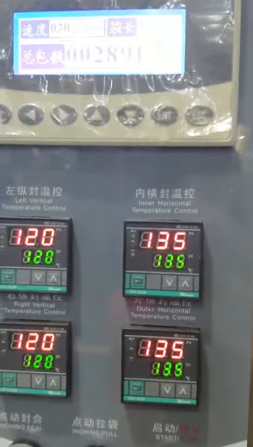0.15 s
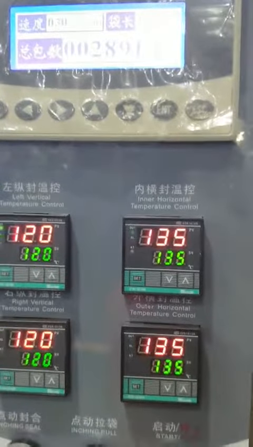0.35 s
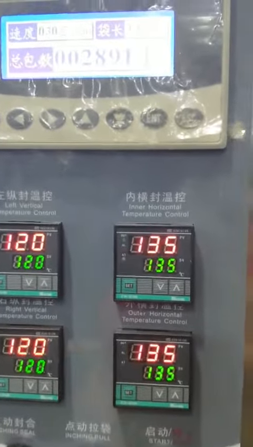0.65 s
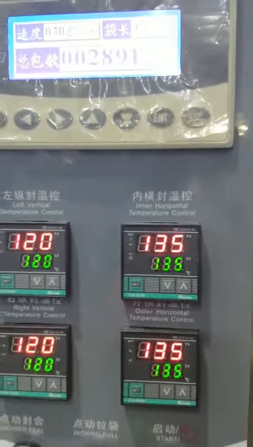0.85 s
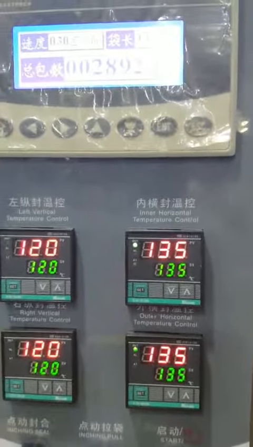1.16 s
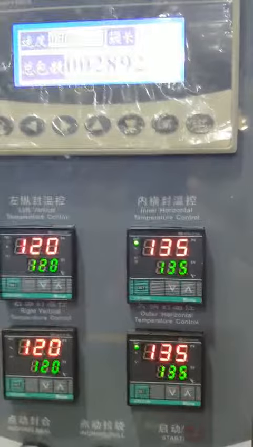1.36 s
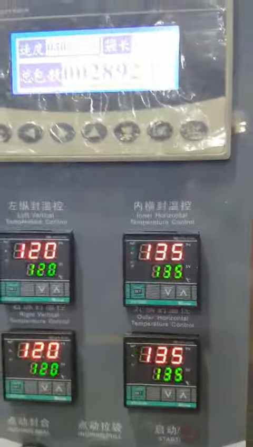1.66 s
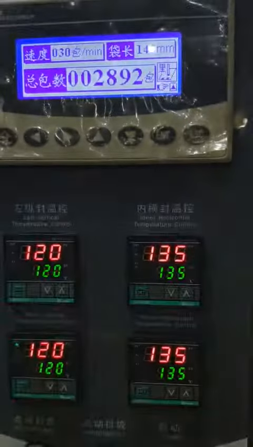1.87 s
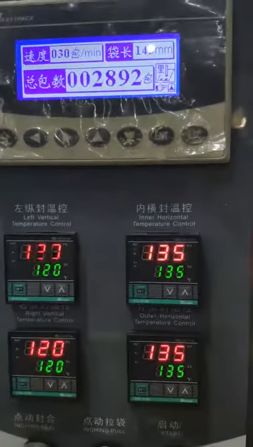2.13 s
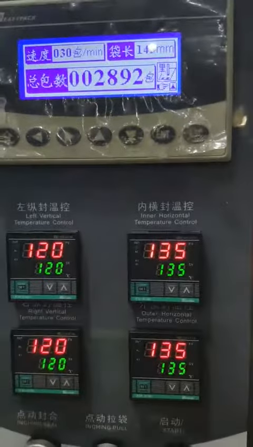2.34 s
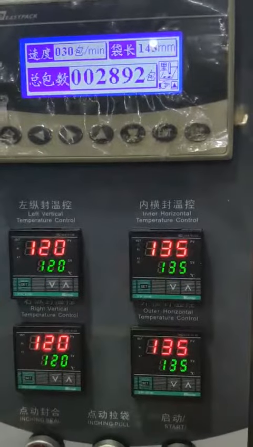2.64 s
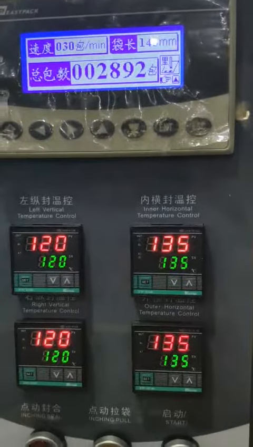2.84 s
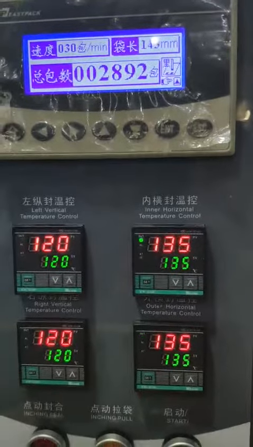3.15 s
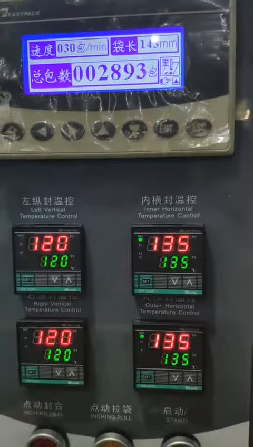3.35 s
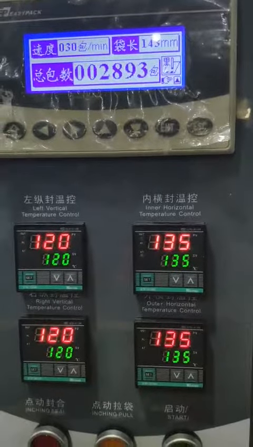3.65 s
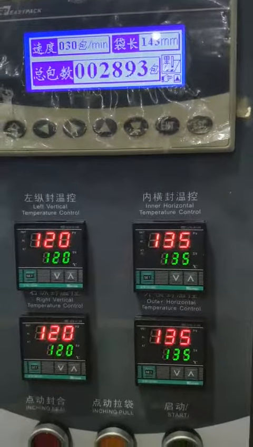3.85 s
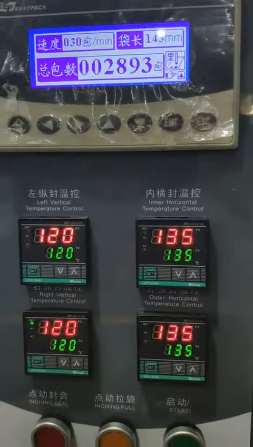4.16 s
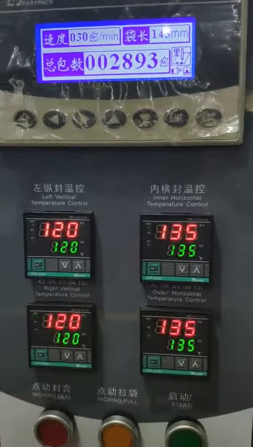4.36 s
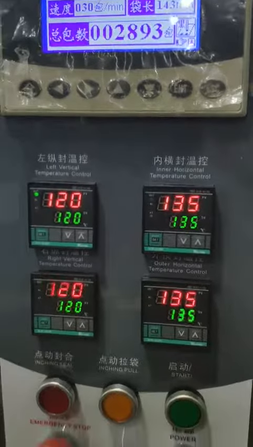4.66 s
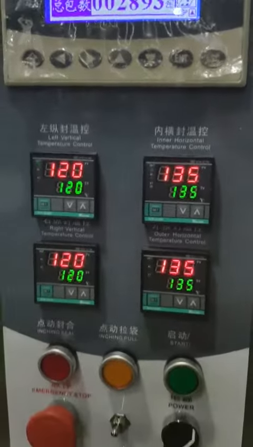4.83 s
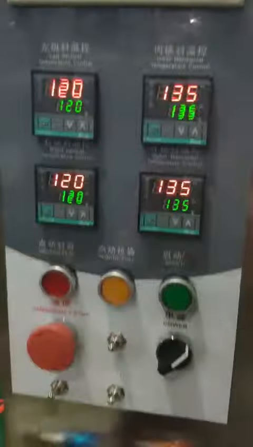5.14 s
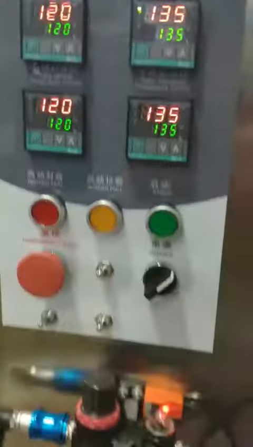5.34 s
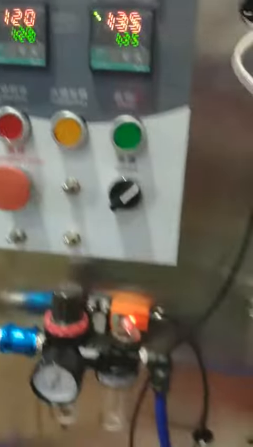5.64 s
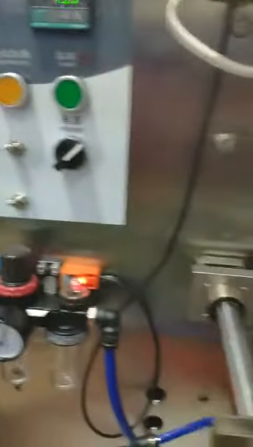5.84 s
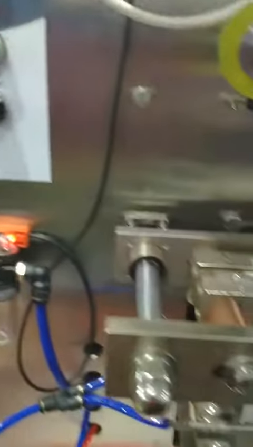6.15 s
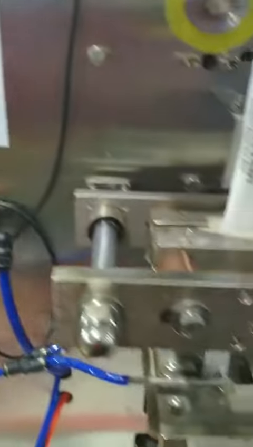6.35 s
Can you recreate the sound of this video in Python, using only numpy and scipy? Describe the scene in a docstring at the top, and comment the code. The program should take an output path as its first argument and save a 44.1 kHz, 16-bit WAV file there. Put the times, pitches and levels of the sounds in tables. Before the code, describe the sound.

A compressed-air packing machine repeats about every 2.2 seconds in a reverberant workshop. Small valve puffs lead to a hard metallic clack, then a duller jaw thump and a bright, steady air hiss. The hiss ends in a loud clank and heavy low rumble with rattling clicks. Motor hum and faint draught lie behind; the close stereo microphones are thin on the left, fuller on the right. A high whistle appears at the end.

```python
"""Pneumatic sachet packer

A sachet packer makes one bag every 2.2 s in a reverberant workshop with motor hum and a draught on the microphones.
In each cycle valves puff, a cylinder clacks on its stop, the sealing jaws thump shut, air blows off
and the jaws rumble open; near the end an air fitting close to the microphones starts a thin whistle.
Air is shaped noise; blows are short noise bursts plus ringing modes; squeaks, hum and whistle are wavering sines."""
import sys
import numpy as np
from scipy import signal
from scipy.fft import rfft, irfft, next_fast_len
from scipy.io import wavfile

SR = 44100
rng = np.random.default_rng(int(sys.argv[2]) if len(sys.argv) > 2 else 0)


def store_pcm(level_fs):
    """Save levels as 16-bit WAV."""
    pcm = np.round(np.clip(level_fs, -1, 1) * 32767).astype(np.int16)
    wavfile.write(sys.argv[1], SR, np.atleast_2d(pcm).T)


N = 286635
TIME = np.arange(N) / SR
CUTOFF_HZ = 16150  # upper limit of the noises and of the microphones

# One row per bag: feed stops t/s, jaws shut t/s, jaws open t/s,
# trim of the short blasts level/dB, sealing air level/dB, its treble level/dB
CYCLES = [(0.2596, 0.7325, 1.5997, 0.5, -24.5, -1.5), (2.4593, 2.9338, 3.798, 0.5, -26.5, 1.5),
          (4.661, 5.1346, 6.023, 1.5, -28.5, 5)]
CUES = ("feed", "shut", "open")
# Air streams out while the jaws press the seam
SEAL_AIR_DELAY_S, SEAL_AIR_OVERRUN_S, SEAL_AIR_RISE_S, SEAL_AIR_FALL_S = 0.17, 0.01, 0.012, 0.0022

# Workshop noise and draught, relative spectra: f/Hz, level/dB
SHOP_COLOUR = [(20, 2.5), (48, -11), (75, 1.5), (170, -3.5), (280, -10), (400, -12.5), (1000, -12),
               (2000, -17), (4000, -24), (8000, -23.5), (11000, -28.5), (16000, -36)]
DRAUGHT_COLOUR = [(20, 4), (48, 6), (90, -0.5), (150, -21), (400, -25), (2000, -80)]
# Draught on the microphones, relative strength: t/s, level/dB
DRAUGHT = [(1.1, -48), (1.36, -37), (1.9, -29.5), (2.7, -35), (2.82, -43.5), (3.15, -30), (3.57, -37.5),
           (3.66, -58), (3.72, -42), (4.0, -36), (4.02, -49), (4.2, -44)]
# Motor hum: f/Hz, level/dB
HUM = [(46.5, -47.5), (134.6, -40)]

# Air whistling at a fitting, relative strength: t/s, upper tones level/dB, lower tones level/dB
WHISTLE = [(6.15, -41, -40), (6.216, -25, -30), (6.246, -31, -28), (6.264, -28, -25.5), (6.282, -33, -34),
           (6.32, -30, -24.5), (6.35, -28, -38), (6.364, -20, -37), (6.38, -43, -27), (6.398, -25, -36),
           (6.416, -24, -57), (6.444, -34, -38), (6.474, -22.5, -42), (6.5, -21, -37)]
# Tones of the whistle, relative strength within each group: f/Hz, level/dB
UPPER_TONES = [(8231, -1), (7639, -9)]
LOWER_TONES = [(4675, -2), (7639, -20)]
FAINT_TONES = [(2471, 3), (3935, -6), (12037, 6), (12656, 0)]
# Rod seals squeaking as the cylinders move: t/s, length t/s, f/Hz, level/dB
SQUEAKS = [(1.686, 0.022, 8500, -38), (1.722, 0.021, 8480, -35), (2.945, .02, 8450, -36),
           (3.865, 0.0082, 8540, -33), (3.886, 0.011, 8560, -30), (3.908, 0.015, 8600, -26)]

# Carriage running along its guides: cue, delay t/s, length t/s, level/dB, rise t/s, fall t/s, treble level/dB
RUNS = [("feed", -0.241, 0.031, -29, 0.009, 0.016, -1), ("shut", -0.043, 0.018, -29, 0.012, 0.011, -17),
        ("open", 0.0407, 0.13, -25, 0.0027, 0.089, 1.8)]
# Relative spectrum of the run: f/Hz, level/dB
RUN_COLOUR = [(40, -20), (80, -7), (115, 10), (165, -3.5), (208, 1), (260, -9), (390, -8.5), (600, -11.5),
              (900, -9.5), (1400, -15), (2500, -27.5), (8000, -34)]

# Short air blasts from the valves, before each bag's trim:
# cue, delay t/s, length t/s, level/dB, rise t/s, fall t/s, treble level/dB
BLASTS = [("feed", -0.242, 0.022, -33.5, 0.007, 0.14, -0.54),
          ("feed", -0.078, 0.034, -30.5, 0.0085, 0.03, -3.5), ("shut", -0.052, 0.04, -27, 0.033, 0.0027, 1),
          ("shut", 0.0013, 0.035, -29.5, 0.0035, 0.098, -5.5),
          ("open", 0.049, 0.25, -29, 0.016, 0.027, 2.1)]
# Relative spectrum of the air: f/Hz, level/dB
AIR_COLOUR = [(300, -19.5), (1700, -16.5), (2030, 3), (2300, -2.5), (2750, -1), (4000, 1), (5500, 3),
              (8000, 0), (10000, -1.5), (12000, -1.5), (16000, -6)]

# Steel parts meeting their stops: cue, delay t/s, level/dB, decay t/s, treble level/dB
CLACKS = [("feed", -0.2, -43, 0.003, 1), ("feed", 0, -16, 0.0079, -1.1), ("feed", 0.009, -26, 0.033, -4),
          ("shut", -0.0148, -20, 0.0011, 10), ("shut", 0, -22, 0.011, -0.9), ("open", 0, -13, 0.0038, 3.9),
          ("open", 0.12, -18.5, 0.0057, 4.1), ("open", 0.25, -26.5, 0.0036, 5.7),
          ("open", 0.483, -36, 0.0037, -6), ("open", 0.62, -37, 0.0045, 12)]
# Relative spectrum of the clacks: f/Hz, level/dB
CLACK_COLOUR = [(100, -20), (500, 13.5), (800, 3), (1150, 10), (1400, -7), (1650, 2.5), (2100, 2),
                (2950, 6), (3280, 2), (3600, 3.5), (4500, -1), (6300, 0), (9000, -2.5), (16000, -15)]
# Well-damped cylinder barrel and bracket, relative strength: f/Hz, level/dB, t60 t/s
BARREL = [(500, -4, .12), (780, -3, .06), (1000, -3, .045), (1180, -5, .035), (1340, -5, .035),
          (1600, -6, .03), (2790, -7, .015), (2990, -2, .02), (3560, -10, .015)]

# Blows on the frame, relative strength: cue, delay t/s, level/dB, contact cut-off f/Hz
SLAMS = [("feed", 0.0011, -27.5, 910), ("shut", 0, -14, 870), ("open", 0.043, -10, 194),
         ("open", 0.079, -15, 180), ("open", 0.165, -25.5, 245)]
# Modes of the machine frame and of the jaw steel, relative strength: f/Hz, level/dB, t60 t/s
FRAME = [(114, -12, 1), (129.5, -19, 0.95), (206.9, -1.5, 0.41), (278.3, -4.5, 0.23), (328, -2.5, 0.13),
         (353.2, -4.5, 0.28), (392.6, 3.5, 0.14), (438, -6, 0.087), (528, 4.5, 0.15), (680, -8, 0.47),
         (742, -1.5, 0.088), (794, 5.5, 0.14), (880, -18, 0.074), (960, -33, 0.061), (1250, -5, .12)]
JAW_STEEL = [(5460, 5, 0.025), (6200, 0, 0.014), (4030, -31, 0.068), (8620, -6.5, .09)]
# Relative spectrum of the sheet panels: f/Hz, level/dB
PANEL_COLOUR = [(60, -32), (160, -22), (207, 10), (245, 0), (300, 2), (390, 0.5), (450, 3.5), (527, -4),
                (620, 1.5), (780, 5), (1200, -7.5), (2000, -19), (6000, -32)]
STRIKE_SPREAD_DB = 1.5  # chance in how hard each strike wakes each mode

# Likeness of the two sides in diffuse noise: f/Hz, left-right correlation
LIKENESS = [(40, 0.67), (150, 0.65), (380, 0.23), (700, 0.42), (1300, -0.33), (2500, 0.057), (16000, -0.14)]
# Reverberation of the hall: f/Hz, t60 t/s
ROOM_T60 = [(100, 0.8), (500, 0.94), (1500, 1), (4000, 0.36), (8000, 0.37), (16000, 0.15)]


def from_db(db):
    """Decibels to gain."""
    return 10 ** (np.asarray(db) / 20)


def rms_one(x):
    """Scale to unit rms."""
    return x / np.sqrt(np.mean(x ** 2) + 1e-20)


def at_hz(points, hz):
    """Read a table on a log-frequency axis."""
    known_hz, values = np.transpose(points)
    return np.interp(np.log(np.maximum(hz, 1)), np.log(known_hz), values)


def drift(rate):
    """Slow chance with spread 1: white noise through two equal low-pass poles at rate Hz."""
    step, settle = 40, 2000  # samples per slow value, slow values dropped at the start
    r = np.exp(-2 * np.pi * rate * step / SR)
    white = rng.standard_normal(N // step + 2 + settle)
    slow = signal.lfilter([1], [1, -2 * r, r * r], white)[settle:]
    return np.interp(np.arange(N) / step, np.arange(len(slow)), rms_one(slow))


def noise(colour, direct=0, left_lag_ms=0):
    """Stereo noise of rms 1: a diffuse part, alike in the bass, and a direct part with a lag between sides."""
    size = next_fast_len(N)
    hz = np.fft.rfftfreq(size, 1 / SR)
    mid, side, straight = rfft(rng.standard_normal((3, size))) * from_db(at_hz(colour, hz))
    alike = at_hz(LIKENESS, hz)
    diffuse = np.sqrt((1 + alike) / 2) * mid + np.sqrt((1 - alike) / 2) * side * [[1], [-1]]
    left = straight * np.exp(-2j * np.pi * hz * left_lag_ms / 1000)
    both = np.sqrt(1 - direct) * diffuse + np.sqrt(direct) * np.array([left, straight])
    return rms_one(irfft(both * (hz < CUTOFF_HZ), size)[:, :N])


def swell(start, end, rise, fall):
    """Builds up exponentially from start, dies away exponentially after end (all in s)."""
    build_up = 1 - np.exp(-np.maximum(TIME - start, 0) / rise)
    die_away = np.exp(-np.minimum(np.maximum(TIME - end, 0) / fall, 60))
    return build_up * die_away


def bursts(rows, source, split_hz):
    """Swells of one noise, each with its own level and share of treble, summed in power."""
    low = signal.sosfilt(signal.butter(1, split_hz, fs=SR, output="sos"), source)
    low_power, high_power = np.zeros((2, N))
    for start, length, db, rise, fall, treble_db in rows:
        shape = from_db(db) * swell(start, start + length, rise, fall)
        low_power += shape ** 2
        high_power += (shape * from_db(treble_db)) ** 2
    return low * np.sqrt(low_power) + (source - low) * np.sqrt(high_power)


def ring(force, hz, t60):
    """A two-pole resonator: a unit click sets a decaying sine of starting height 1 ringing."""
    r = from_db(-60 / (t60 * SR))
    w = 2 * np.pi * hz / SR
    return signal.lfilter([0, np.sin(w)], [1, -2 * r * np.cos(w), r * r], force + 1e-18)


def tone(hz, waver_hz, rate, phase_spread=5.5):
    """A wavering sine of rms 1 that reaches each microphone in a phase of its own (spread in rad)."""
    phase = 2 * np.pi * np.cumsum(hz + waver_hz * drift(rate)) / SR
    return np.sqrt(2) * np.sin(phase + phase_spread * rng.random((2, 1)))


def every_cycle(steps):
    """Play a list of cued steps once per bag; each row then starts with its time."""
    return [(cycle[CUES.index(cue)] + delay, *rest)
            for cycle in CYCLES
            for cue, delay, *rest in steps]


def workshop(x, even_share=0.06, even_s=0.15):
    """A reverberant tail of about a second at all pitches, plus the hall's tail, which dies sooner in the treble."""
    t = TIME[:SR]
    hz = np.arange(SR // 2 + 1)  # one second of response gives 1 Hz bins
    white = rfft(rng.standard_normal((2, SR)))
    edges_hz = [0, 250, 700, 1800, 3500, 6000, 10000, SR]
    even = np.exp(-t / even_s) * np.sqrt(2 / even_s / SR)
    response = 0
    for low, high in zip(edges_hz, edges_hz[1:]):
        t60 = at_hz(ROOM_T60, (low + min(high, CUTOFF_HZ)) / 2)
        hall = np.exp(-np.log(1000) * t / t60) * np.sqrt(2 * np.log(1000) / SR)
        envelope = np.sqrt(even_share * even ** 2 + (1 - even_share) * hall ** 2)
        response = response + irfft(white * ((hz >= low) & (hz < high)), SR) * envelope
    fade_in = np.minimum(t / 0.002, 1)
    return signal.fftconvolve(x, response * fade_in, axes=1)[:, :N]


def background(shop_db=-33.0, draught_db=6.0, hum_waver_db=0.2, restless_db=0.5):
    """Workshop noise, motor hum and a draught buffeting the microphones."""
    hum = sum(from_db(db + hum_waver_db * drift(9.8)) * tone(hz, waver_hz=5.93, rate=9.8, phase_spread=1.0)
              for hz, db in HUM)
    s, level_db = np.transpose(DRAUGHT)
    gusts = np.interp(TIME, s, from_db(level_db + draught_db), left=0, right=0)
    shop = from_db(shop_db + restless_db * drift(24)) * noise(SHOP_COLOUR)
    return shop + hum + gusts * noise(DRAUGHT_COLOUR)


def whistle(flutter_db=2.5, rush_db=-35, upper_db=-7, lower_db=1.0, faint_db=-47):
    """A rush of air narrows into edge tones that swell and fade independently; faint ones join in last."""
    s, upper, lower = np.transpose(WHISTLE)
    rush = noise([(3000, -40), (4400, -34), (4850, 2), (5400, -7), (7500, -40)])  # f/Hz, level/dB
    out = from_db(rush_db) * swell(5.23, 6.3, rise=0.27, fall=0.018) * rush
    levels = (np.interp(TIME, s, from_db(upper + upper_db), left=0),
              np.interp(TIME, s, from_db(lower + lower_db), left=0),
              from_db(faint_db) * swell(6.35, 6.8, rise=0.04, fall=0.047))
    for level, tones in zip(levels, (UPPER_TONES, LOWER_TONES, FAINT_TONES)):
        chord = sum(from_db(db) * tone(hz, waver_hz=14.8, rate=51.3, phase_spread=2.5) for hz, db in tones)
        out = out + level * from_db(flutter_db * drift(47)) * chord
    return out


def squeaks():
    """Rubber seals stick and sing for a moment: short wavering sines."""
    return sum(from_db(db) * swell(s, s + length, 0.00096, 0.0018) * tone(hz, waver_hz=50, rate=113)
               for s, length, hz, db in SQUEAKS)


def carriage():
    """The moving carriage shakes the cabinet: swells of mostly low noise."""
    return bursts(every_cycle(RUNS), noise(RUN_COLOUR, direct=0.33), split_hz=620)


def valve_openings():
    """Each cycle has its short blasts and one long stream of air from the pressed seam until the jaws open."""
    rows = []
    for feed, shut, opens, blast_db, seal_db, seal_treble_db in CYCLES:
        at = dict(zip(CUES, (feed, shut, opens)))
        for cue, delay, length, db, *shape in BLASTS:
            rows.append((at[cue] + delay, length, db + blast_db, *shape))
        start = shut + SEAL_AIR_DELAY_S
        length = opens + SEAL_AIR_OVERRUN_S - start
        rows.append((start, length, seal_db, SEAL_AIR_RISE_S, SEAL_AIR_FALL_S, seal_treble_db))
    return rows


def exhaust(flutter_db=0.88, echo_s=0.001122, echo_gain=0.25, sway=0.062):
    """Turbulent jets from the valve ports; a cabinet echo ripples their colour as the microphones sway."""
    air = noise(AIR_COLOUR, direct=0.21, left_lag_ms=0.2205)
    jet = bursts(valve_openings(), air, split_hz=4400) * from_db(flutter_db * drift(26))
    earlier = TIME - echo_s * (1 + sway * drift(0.59))
    echo = np.array([np.interp(earlier, TIME, side) for side in jet])
    return jet + echo_gain * echo


def clacks(contact_s=0.0014, rise_s=0.00056, rattle_db=2.0, barrel_db=-5, seat_s=0.002038):
    """Hard contacts wake a dense, quickly damped cloud of steel modes; as the piston seats, the barrel rings."""
    hits = every_cycle(CLACKS)
    rows = [(s, contact_s, db, rise_s, decay, treble_db) for s, db, decay, treble_db in hits]
    cloud = noise(CLACK_COLOUR, direct=0.13, left_lag_ms=-0.288)
    out = bursts(rows, cloud, split_hz=12000) * from_db(rattle_db * drift(300))
    heard = [hit for hit in hits if (hit[0] + seat_s) * SR < N]
    s, db, _, treble_db = np.transpose(heard)
    seats = ((s + seat_s) * SR).astype(int)
    for hz, mode_db, t60 in BARREL:
        chance_db = rng.normal(0, STRIKE_SPREAD_DB, len(s))
        force = np.zeros(N)
        # light, bright contacts barely move the barrel
        force[seats] = from_db(db - treble_db + barrel_db + mode_db + chance_db)
        out = out + ring(force, hz, t60) * rng.choice([-1, 1], (2, 1))
    return out


def jaws(frame_db=-5.0, panel_db=-1, panel_hz=600, panel_decay_s=0.058,
         bounce_s=0.015, bounce_db=-8, steel_db=-1, steel_hz=1000, count=4):
    """The jaws hit and bounce; the frame rings, sheet panels clatter and hard blows make the steel ping."""
    s, db, contact_hz = np.array(every_cycle(SLAMS)).T[:, :, None]

    def strength(hz):
        """A soft contact hardly excites what lies above its cut-off."""
        return db - 20 * np.log10(1 + (hz / contact_hz) ** 2)

    rows = [(at, 0.006, level + panel_db, 0.0015, panel_decay_s, 0)
            for at, level in zip(s[:, 0], strength(panel_hz)[:, 0])]
    out = bursts(rows, noise(PANEL_COLOUR, direct=0.21), split_hz=1000)

    touch = np.arange(count)  # 0 is the blow itself, the rest are bounces
    times = s + bounce_s * touch * rng.uniform(0.705, 1.3, (len(s), count))
    for hz, mode_db, t60 in FRAME:
        chance_db = rng.normal(0, STRIKE_SPREAD_DB, times.shape)
        force = np.zeros(N)
        force[(times * SR).astype(int)] = from_db(
            strength(hz) + frame_db + mode_db + bounce_db * touch + chance_db)
        out = out + ring(force, hz, t60) * rng.choice([-1, 1])

    ping = np.zeros(N)
    ping[(s * SR).astype(int)] = from_db(strength(steel_hz) + steel_db)
    return out + sum(from_db(mode_db) * ring(ping, hz, t60) for hz, mode_db, t60 in JAW_STEEL)


def scene(air_room_db=-9, clack_room_db=-1, jaw_room_db=-3, carriage_room_db=-5):
    """The air jets are near and fairly dry; the blows fill the hall."""
    behind = background() + whistle()
    run = carriage()
    air = exhaust() + squeaks()
    steel = clacks()
    slam = jaws()
    sent = from_db(air_room_db) * air + from_db(clack_room_db) * steel
    sent = sent + from_db(jaw_room_db) * slam + from_db(carriage_room_db) * run
    return behind + run + air + steel + slam + workshop(sent)


def port(x, hz, width_hz, boost_db):
    """The cavity in front of a microphone lifts one band."""
    b, a = signal.iirpeak(hz, hz / width_hz, fs=SR)
    return x + (from_db(boost_db) - 1) * signal.lfilter(b, a, x)


def record(dry):
    """Two unlike microphones: the left thin with a sharp treble peak, the right full with a broad presence lift."""
    bass_cut_hz, bass_left_db = 370, -18
    bass = signal.sosfilt(signal.butter(1, bass_cut_hz, fs=SR, output="sos"), dry[0])
    thin = dry[0] - (1 - from_db(bass_left_db)) * bass
    left = port(thin, hz=8086, width_hz=724, boost_db=17.0)
    right = port(dry[1], hz=4440, width_hz=2580, boost_db=7.5)
    clipped = np.clip([left, right], -0.88, 0.88)
    low_pass = signal.ellip(12, 0.1, 90, CUTOFF_HZ, fs=SR, output="sos")
    return signal.sosfilt(low_pass, clipped)


dry = scene()
out = record(dry)
store_pcm(out)
```